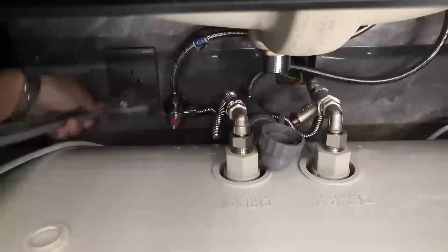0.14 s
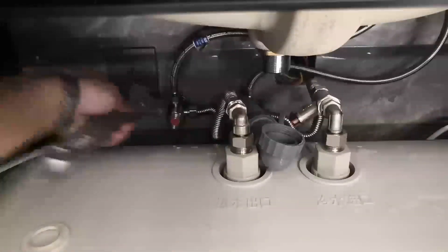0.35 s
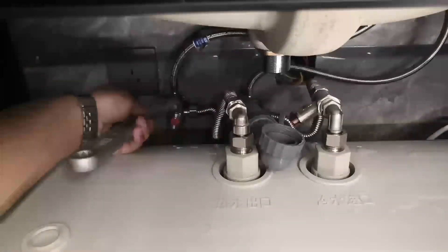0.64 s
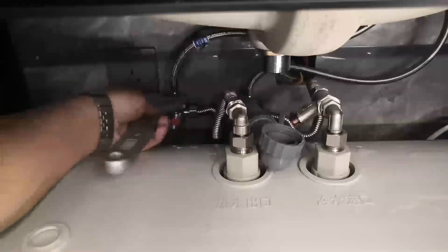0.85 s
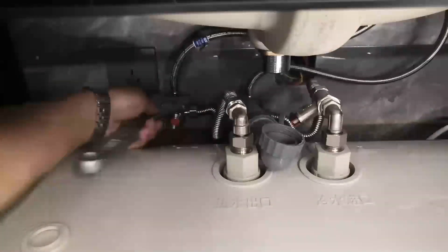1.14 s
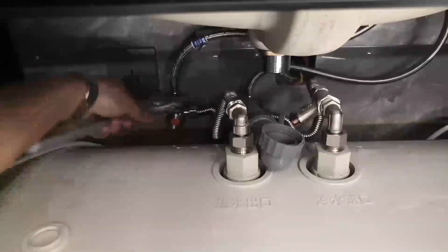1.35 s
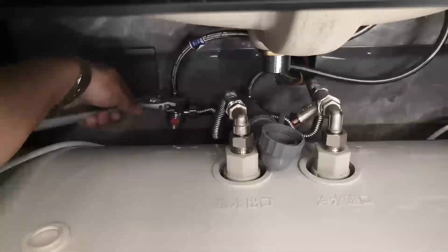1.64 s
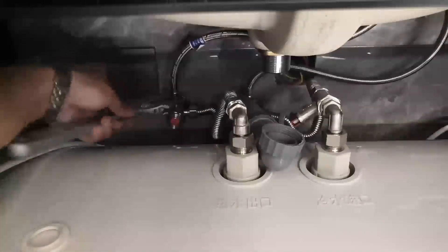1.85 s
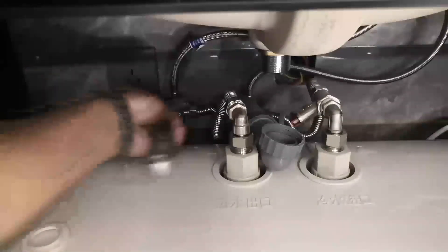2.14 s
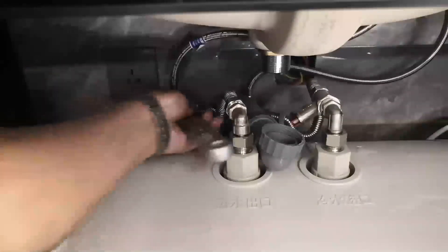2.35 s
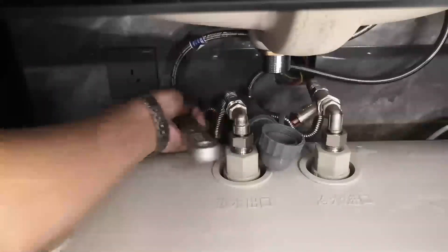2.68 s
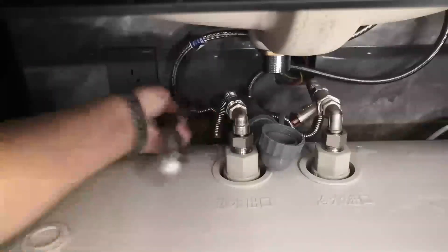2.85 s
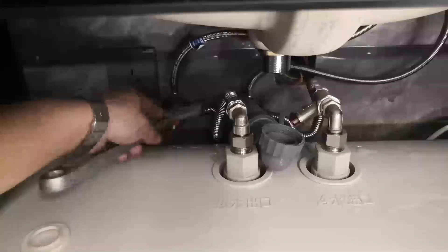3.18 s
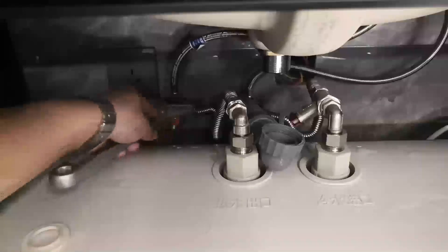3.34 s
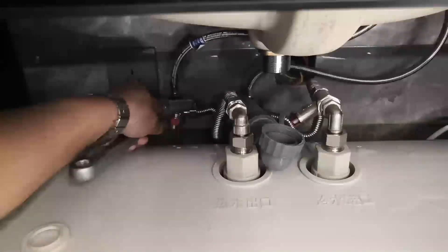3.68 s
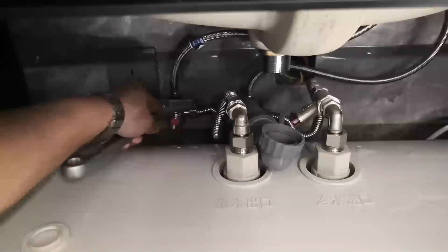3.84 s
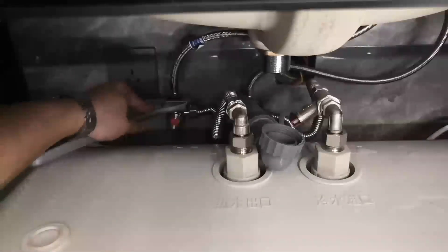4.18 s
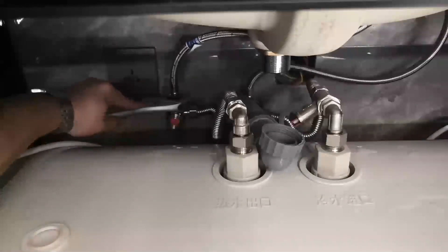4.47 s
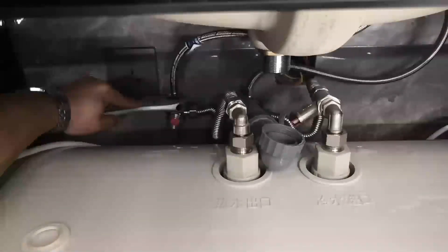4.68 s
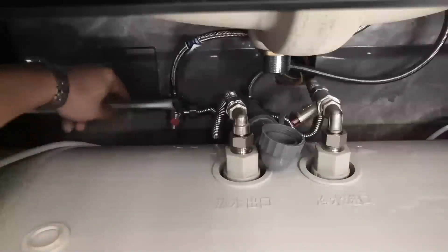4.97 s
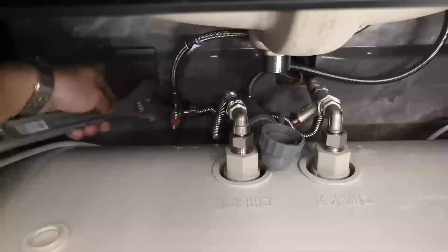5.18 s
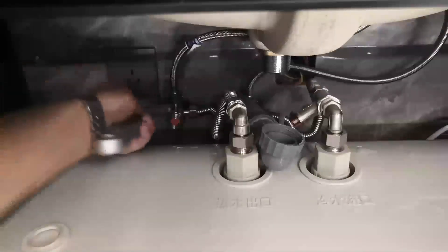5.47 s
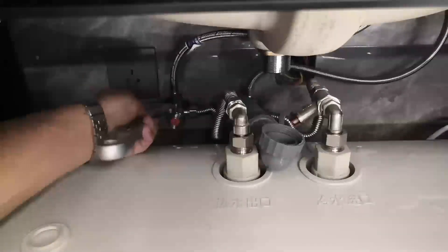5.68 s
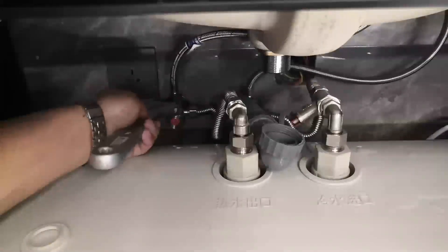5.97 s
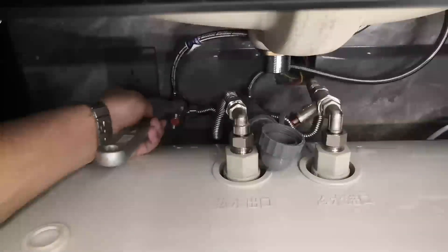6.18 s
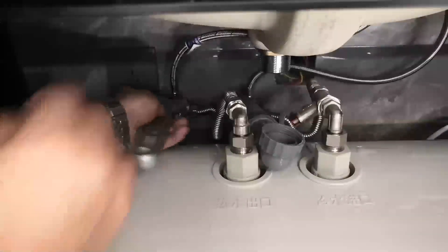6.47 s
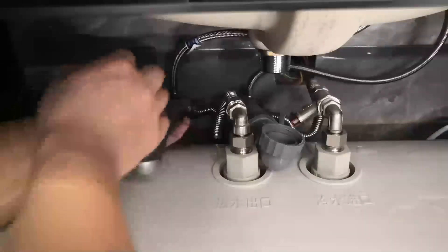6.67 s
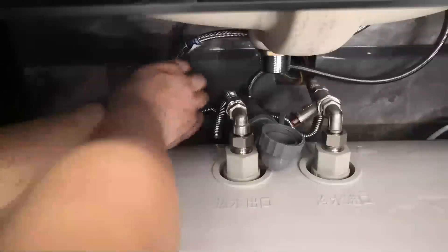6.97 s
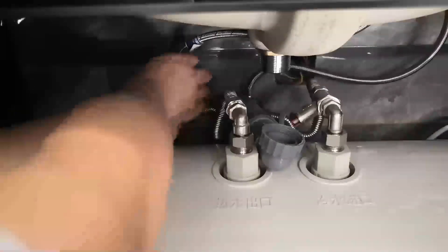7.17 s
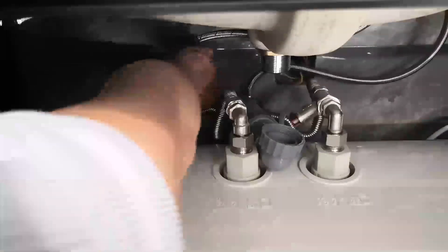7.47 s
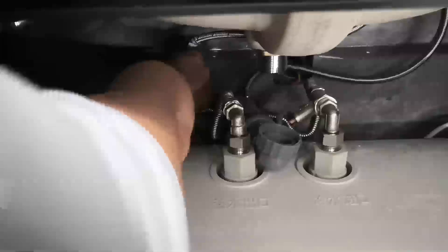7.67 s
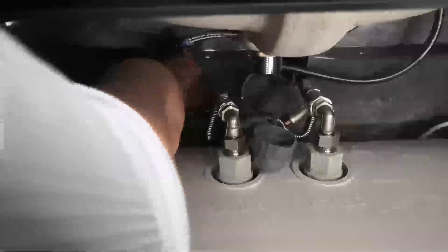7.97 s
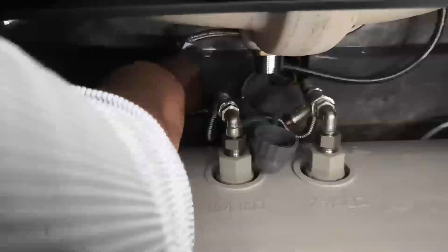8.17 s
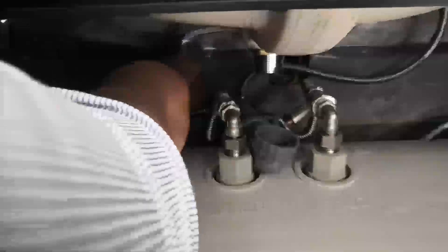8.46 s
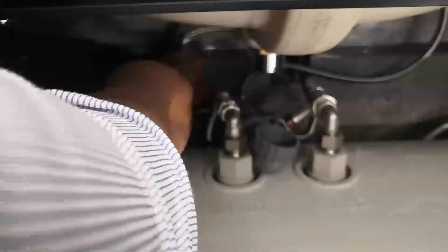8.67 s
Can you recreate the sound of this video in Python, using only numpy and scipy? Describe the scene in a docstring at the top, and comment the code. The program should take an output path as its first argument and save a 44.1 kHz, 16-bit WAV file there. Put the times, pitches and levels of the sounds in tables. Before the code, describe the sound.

A steady low rumble and soft hiss fill a cramped space under a sink, picked up by a close stereo microphone. Light wrench clicks on a nut come at about 0.7, 1.1 and 1.5 s, with small taps to 1.9 s. From 2.6 to 3.1 s clacks and scraping cluster; around 3.35 s a hollow pipe-and-tank knock sounds. Bright hard clanks at 3.7-4.0 s leave the loose jaw jangling. At 4.3 s friction starts a thin, wavering tank tone, near 1100 Hz, fading after 4.8 s among knocks. A quieter gap lasts until 5.7 s. Sharp ringing knocks crowd 5.95-6.65 s, and another burst falls at 7.0-7.1 s, with jangle and rubbing. Faint taps follow at 7.6-8.6 s as the wrench comes away. Dry cloth snaps and crackle hit the left side at 8.67-8.8 s. Echoes are short.

```python
"""Under a sink, over a steady rumble and hiss, a steel wrench is set on a hose nut with light clicks.
It is then turned: each contact is a short chatter of noise that rings wrench, fittings, pipes, tank and cabinet.
The loose jaw jangles on after some of the contacts, friction hisses and scrapes, and at 4.32 s the tank sings.
More hard knocks follow from about 5.7 to 7.1 s; then the wrench is lifted off with faint taps.
Last, cloth snaps on the left of two close microphone ports. Levels are as they reach the microphone."""
import sys
import numpy as np
from scipy import signal
from scipy.fft import rfft, irfft, next_fast_len
from scipy.io import wavfile
from scipy.ndimage import uniform_filter1d, map_coordinates

SR = 44100
rng = np.random.default_rng(int(sys.argv[2]) if len(sys.argv) > 2 else 0)


def wrap_up_sound(samples):
    """Save the sound to the file named by the first command line argument, as 16-bit audio."""
    columns = np.atleast_2d(samples).T
    # keep every value between -1 and 1, then stretch to whole-number steps
    tamed = np.clip(columns, -1, 1)
    steps = np.round(tamed * 32767).astype(np.int16)
    wavfile.write(sys.argv[1], SR, steps)


N = 389391


def amp(db):
    """Turn decibels into a plain gain."""
    return 10 ** (np.asarray(db) / 20)


def unit(x):
    """Scale each row to an rms of 1."""
    return x / np.sqrt(np.mean(x ** 2, -1, keepdims=True) + 1e-20)


def along(points, hz):
    """Read a curve of (f/Hz, value) points, joined by straight lines on a log frequency axis."""
    f, v = np.transpose(points)
    return np.interp(np.log(hz + 1), np.log(f + 1), v)


def wobble(rate):
    """A smooth random curve with `rate` random points a second."""
    knots = rng.standard_normal(int(N * rate / SR) + 4)
    return map_coordinates(knots, [np.arange(N) * rate / SR])


def filtered(x, response):
    """Shape x by a response that depends on frequency."""
    m = next_fast_len(N + SR // 2)
    return irfft(rfft(x, m) * response(np.fft.rfftfreq(m, 1 / SR)), m)[..., :N]


def resonance(f, hz, width_hz):
    """One part that likes to vibrate at hz; the narrower the peak, the longer it rings."""
    return 1j * f * width_hz / (hz * hz - f * f + 1j * f * width_hz)


def body(peaks, f):
    """An object as a sum of resonances; neighbours in the list push in opposite directions."""
    return sum((-1) ** k * amp(db) * resonance(f, hz, width) for k, (hz, width, db) in enumerate(peaks))


# how far the left microphone port leads the right: [f/Hz, phase/rad]
PORT_LEAD = [(0, 0), (340, 0.0), (780, 3.2), (1380, -0.1), (1640, 0.5), (2240, -3.0), (2580, -3.3),
             (3530, -7.4), (5430, -6.3), (10700, -6.3)]


def ports(f):
    """The phase step between the two microphone ports, half on each side."""
    return np.exp(.5j * np.array([[1], [-1]]) * along(PORT_LEAD, f))


def pair(z, alike, f):
    """Mix two unrelated spectra into left and right, as alike as asked at each frequency."""
    turn = np.arccos(np.clip(along(alike, f), -1, 1)) / 2
    mid = z[..., 0, :] * np.cos(turn)
    side = z[..., 1, :] * np.sin(turn)
    return np.stack([mid + side, mid - side], -2)


def noise(patchy_db, alike, colour):
    """Coloured stereo noise of rms 1, with random louder and softer patches in time and frequency."""
    z = signal.stft(rng.standard_normal((2, N)), nperseg=256)[2]
    across_pitch = uniform_filter1d(rng.standard_normal(z.shape[1:]), size=4, axis=0)
    field = uniform_filter1d(across_pitch, size=6, axis=1)
    x = signal.istft(z * amp(patchy_db * field / field.std()), nperseg=256)[1][:, :N]
    m = next_fast_len(N + SR // 2)
    f = np.fft.rfftfreq(m, 1 / SR)
    return unit(irfft(pair(rfft(x, m), alike, f) * colour(f), m)[:, :N])


# colour of the room's rumble, then of its hiss: [f/Hz, relative level/dB]
RUMBLE_COLOUR = [(15, -37), (25, -7.5), (43, -3.5), (128, -2.5), (163, -19.5), (189, -14), (210, -4.5),
                 (274, -12), (293, -12), (357, -11), (392, -34.5), (436, -18.5), (479, -24), (518, -30.5),
                 (600, -43.5), (780, -71), (1320, -120)]
HISS_COLOUR = [(290, -31.5), (500, -0.5), (588, -4), (924, -3.5), (1220, -6), (1330, 1.5), (1420, 0.5),
               (10000, -25.5), (13000, -39.5), (22000, -120)]
# how alike left and right are: [f/Hz, likeness from -1 to 1]
HUM_LIKENESS = [(60, 0.98), (170, 1), (280, 0.51), (470, 0.042), (1330, -0.38), (3750, -0.028), (10500, 1)]


def hum(rumble_db=-52.5, hiss_db=-61.5):
    """The room's steady rumble and hiss, two layers of coloured noise."""
    rumble = noise(2.54, HUM_LIKENESS, lambda f: amp(along(RUMBLE_COLOUR, f)))
    hiss = noise(2.2, HUM_LIKENESS, lambda f: amp(along(HISS_COLOUR, f)))
    return amp(rumble_db) * rumble + amp(hiss_db) * hiss


# cloth catching on the left microphone port: [t/s, peak level/dB]
CLOTH_SNAGS = [(8.6741, -28), (8.679, -26), (8.6895, -34), (8.7566, -32), (8.7684, -22), (8.7812, -23),
               (8.7872, -30), (8.8095, -22), (8.813, -20)]


def sleeve(crackle_db=-14, drop_10db_s=.0089, right_db=-22):
    """Cloth makes short dry snaps, each leaving a little crackle, barely heard by the right port."""
    snaps, t, now = np.zeros(N + SR), np.arange(60) / SR, np.arange(N) / SR
    level = 0
    for s, db in CLOTH_SNAGS:
        snap = np.cos(2 * np.pi * rng.uniform(2000, 4000) * t) * amp(-60 * t / .0014)
        snaps[round(s * SR):][:len(t)] += amp(db) * snap
        level = level + (now > s) * amp(db + crackle_db - 10 * np.abs(now - s) / drop_10db_s)
    grit = amp(4 * wobble(500)) * rng.standard_normal(N)
    crackle = level * unit(filtered(grit, lambda f: resonance(f, 2000, 3000) ** 2))
    return (snaps[:N] + crackle) * amp([[0], [right_db]])


def singing(hz=1122, width_hz=20, start_s=4.32, hold_until_s=4.76, level_db=-49.5, drop_20db_s=.16):
    """As the nut drags round, friction makes the tank sing one thin note that wavers, holds and fades."""
    now = np.arange(N) / SR
    fade_db = 20 * np.maximum(now - hold_until_s, 0) / drop_20db_s
    level = (now > start_s) * amp(level_db - fade_db)
    return level * noise(0.63, [(1000, 0.94)], lambda f: resonance(f, hz, width_hz) ** 2 * ports(f))


# strokes of jaws, hand and sleeve: [peak t/s, swell/s, fade/s, low drag level/dB, scrape level/dB,
# rustle level/dB, left over right/dB (scrape and rustle only)]
RUB_STROKES = [(.72, 0.06, 0.21, -85, -43.5, -45, 0), (1.56, 0.076, 1, -57.5, -58.5, -70, 0),
               (1.72, 0.32, 0.24, -73, -51.5, -80, -1), (1.85, 0.044, 0.065, -61, -55, -86, 1),
               (2.659, 0.067, 0.14, -49, -36.5, -40.5, -2), (3.051, 0.13, 0.17, -55, -35, -41.5, -1.5),
               (3.41, 0.031, 0.31, -40.5, -32, -75.5, -1), (3.85, 0.1, 0.089, -67.5, -49.5, -38.5, -1.5),
               (4.12, 0.11, 0.32, -60, -60, -48, -7), (4.5, 0.19, 0.19, -45.5, -43.5, -79, 0.5),
               (4.8, 0.14, 0.38, -55, -53, -59, 0.5), (5.76, 0.061, 0.18, -39.5, -38.5, -58, -2),
               (6.1, 0.2, 0.64, -55.5, -65.5, -50.5, 0), (6.49, 0.074, 0.21, -45, -44.5, -40.5, 0),
               (6.68, 0.067, 0.14, -34, -39.5, -42.5, 0), (7.201, 0.23, 0.29, -49.5, -39, -44, -2),
               (7.602, 0.048, 0.37, -54, -45, -54.5, 0), (8.8, 0.058, 0.17, -50, -44.5, -61, 16),
               (8.5, 0.087, 0.17, -57, -59, -50.5, 13.5)]
# colour of the rustle: [f/Hz, relative level/dB]
RUSTLE_COLOUR = [(1470, -7), (2500, 1), (4190, 1), (9370, -5.5), (9770, -34), (10500, -59), (13600, -102.5),
                 (22000, -120)]
# resonances of pipework, sheet-metal tank, cabinet panel, air in the cabinet, and the broad
# bands of the short brass fittings; contacts() uses them too: [f/Hz, width/Hz, relative level/dB]
PIPE_PEAKS = [(1565, 120, 7.5), (1926, 200, 11), (2440, 244, 15.5), (2446, 207, 10.5), (2696, 85, 1.5),
              (2830, 82, 5.5), (3260, 1300, -5.5), (3780, 750, -1.5)]
TANK_PEAKS = [(539.5, 69, -2.5), (691, 120, -1.5), (762.5, 6.7, 11), (833, 41, 6), (959, 42, 12),
              (961.5, 198, 8), (1047.3, 27, 10), (1098, 8.9, 5.5), (1258, 330, -5.5), (1395, 12, 0.5),
              (1642, 5.3, 2), (2040, 52, -12)]
PANEL_PEAKS = [(204, 23.5, 5.5), (318.7, 44, -1.5), (434, 130, -8)]
AIR_PEAKS = [(95, 27, 0.0097), (138, 33, 0.0036)]
FITTING_PEAKS = [(2830, 130, 2), (3950, 160, -6), (4400, 130, 1), (4640, 110, 2), (5350, 140, -6),
                 (5750, 220, 2), (6700, 170, -2), (7350, 200, -1), (7950, 170, -3), (9050, 220, -7)]
# how alike left and right are in drag and echoes: [f/Hz, likeness from -1 to 1]
ROOM_LIKENESS = [(100, 1), (300, 0.67), (1000, 0.067), (10000, 0.8)]


def rubbing(stroke_drop_db=20.5, rest_db=(-62.5, -72, -83), step=64):
    """Gritty friction, its grip changing fast, sounds through panel, tank and pipes; cloth and steel hiss."""
    s, swell_s, fade_s, *level_db, pan_db = np.transpose(RUB_STROKES)[:, :, None]
    late = np.arange(0, N, step) / SR - s
    # a stroke loses stroke_drop_db over one swell or fade time
    shape = amp(-stroke_drop_db * np.where(late < 0, (late / swell_s) ** 2, late / fade_s))
    sides = amp(pan_db * [.5, -.5])

    def level(db, faint_db):
        """Add up the strokes over a faint resting level, left and right, sample by sample."""
        coarse = (amp(db) * sides).T @ shape + amp(faint_db)
        return np.array([np.interp(np.arange(N), np.arange(len(c)) * step, c) for c in coarse])

    drag, scrape, rustle = [level(db, faint_db) for db, faint_db in zip(level_db, rest_db)]
    grip = amp(2 * wobble(300) + 2 * wobble(50) + 2 * wobble(14))
    cabinet = lambda f: body(PANEL_PEAKS, f) + amp(2.5) * body(AIR_PEAKS, f)
    sheet = lambda f: (body(TANK_PEAKS, f) + amp(-5.5) * body(PIPE_PEAKS, f)) * ports(f)
    hiss = lambda f: amp(along(RUSTLE_COLOUR, f)) * (.7 + body(FITTING_PEAKS, f)) * ports(f)
    # the low drag keeps one level for both sides
    drag = drag.mean(0) * noise(4.0, ROOM_LIKENESS, cabinet)
    scrape = scrape * noise(1.8, [(1000, 0.2)], sheet)
    rustle = rustle * noise(3.5, [(5000, .6)], hiss)
    return drag + grip * (scrape + rustle)


# modes of the wrench, used by contacts() too: [f/Hz, width/Hz before any blur, relative level/dB]
WRENCH_MODES = [(1530, 14, -7.5), (1960, 10, -11), (2315, 20, -8), (2800, 27, 1.5), (2860, 9, -7),
                (3550, 12, -14), (4120, 14, -7), (4226, 14, -22.5), (4377, 3.3, -2.5), (4625, 3.3, 1),
                (4670, 16, -1), (5500, 11, -13), (5340, 8.3, -12.5), (5900, 12, -1), (5700, 10, -8.5),
                (5810, 26, -2.5), (5925, 19, -5), (5620, 18, -5), (6560, 20, -10.5), (6770, 12, -2),
                (7289, 16, 3), (7670, 39, -5.5), (7450, 18, -11), (9200, 9.5, -18), (9500, 16, -10.5)]
# groups of wrench modes, low, middle, high and top: [from f/Hz, to f/Hz]
JANGLE_GROUPS = [(1400, 3500), (3500, 5000), (5000, 6200), (6200, 9500)]
# jangling after some of the contacts: [t/s, time to lose 60 dB/s, low level/dB, middle level/dB,
# high level/dB, top level/dB]
JANGLE_TIMES = [(0.77, 0.78, -61, -57, -53, -60), (1.14, 0.89, -72, -75, -66, -69),
                (2.72, 0.58, -52, -57, -53.5, -50), (3.049, 0.53, -46, -50, -47, -49),
                (3.82, 0.72, -46, -44, -50, -49), (4.01, 0.66, -39.5, -35, -37.5, -42),
                (4.67, 0.66, -55, -53, -55, -47), (6.045, .8, -43, -39, -43.5, -49),
                (6.35, 0.74, -50, -53, -53, -49), (7.11, 0.97, -39, -53, -44, -45)]


def jangle(blur=3, onset_s=.0087):
    """The wrench hangs loose on the nut; its jaw widens the modes and keeps them sounding, wavering."""
    now, out = np.arange(N) / SR, 0
    for k, (low, high) in enumerate(JANGLE_GROUPS):
        level = 0
        for s, t60, *db in JANGLE_TIMES:
            onset = np.clip((now - s) / onset_s, 0, 1)
            level = level + onset * amp(db[k] - 60 * np.abs(now - s) / t60)
        group = [mode for mode in WRENCH_MODES if low < mode[0] < high]
        modes = lambda f: sum(amp(db) * resonance(f, hz, blur * width) ** 2 for hz, width, db in group)
        out = out + level * noise(4.8, [(5000, 1.0)], lambda f: ports(f) * modes(f))
    return out


# how fast echoes die: [f/Hz, time to lose 60 dB/s]
ECHO_TIMES = [(150, 0.78), (700, 0.34), (2000, 0.14), (5000, 0.14), (10000, 0.14)]


def tails(count):
    """Stereo room echoes of energy 1, made of noise; each frequency dies at its own speed."""
    f, t, z = signal.stft(rng.standard_normal((count, 2, SR // 2)), SR, nperseg=256)
    tail = signal.istft(z * amp(-60 * t / along(ECHO_TIMES, f)[:, None]), SR, nperseg=256)[1]
    return unit(tail) / np.sqrt(tail.shape[-1])


SPAN, LEAD_IN = 32768, 1000  # samples per contact, and how many of them come before it


def close(to_hz, own_hz):
    """How near two pitches lie: 1 when equal, falling off over about three percent."""
    return np.exp(-(np.log(own_hz / to_hz) / .03) ** 2)


def chatter(s, fall_ms, grain_db=4, rattle_t60=1.0, blow=8.35, blow_ms=9.8):
    """Spectra of the noisy force of each contact, and of the shaking that rattles the wrench on after it."""
    rise_ms = 0.18 * fall_ms
    ms = 1000 * np.arange(-LEAD_IN, SR // 3) / SR
    late = ms - rise_ms
    # short rises start abruptly, long ones swell
    rising = np.clip(ms / np.maximum(rise_ms, .3), 0, 1) ** (rise_ms / 7)
    swell = np.where(late < 0, rising, np.exp(-(late / np.maximum(fall_ms, 1)) ** 2))
    rattle = np.where(late < 0, rising, amp(-60 * np.abs(late) / 1000 / rattle_t60))
    # the next contact stops the rattle
    rattle = rattle * (ms < 1000 * np.diff(s, axis=0, append=np.inf))
    # tiny uneven taps about a millisecond long
    grain = uniform_filter1d(rng.standard_normal(swell.shape), size=30, axis=1)
    taps = amp(grain_db * unit(grain))
    # one first tap stands out, less so in chatters longer than blow_ms
    first_tap = blow * np.exp(-(fall_ms / blow_ms) ** 2) * (np.arange(len(ms)) == LEAD_IN + 20)
    envelopes = np.array([swell * taps, swell + 0.35 * rattle])
    return rfft(envelopes * rng.standard_normal(swell.shape) + first_tap, SPAN)


def wrench_ring(shaking, f, hz, first_hz, second_hz, ring_db, fall_ms, scatter_db=2):
    """The steel wrench rings in the modes its striking point favours, damped by the hand."""
    mode_hz, width, mode_db = np.transpose(WRENCH_MODES)
    near = 0.15 + close(first_hz, mode_hz) + 0.78 * close(second_hz, mode_hz) + 0.12 * close(hz, mode_hz)
    signs = (-1) ** np.arange(len(WRENCH_MODES))
    share = near * amp(mode_db + scatter_db * rng.standard_normal(near.shape)) * signs
    # every mode gets its share of the shaking, whatever the chance dips of its spectrum
    power = uniform_filter1d(np.abs(shaking) ** 2, size=7, axis=1)
    share = share / np.sqrt(power[:, np.round(mode_hz * SPAN / SR).astype(int)] + 1e-12)
    ring = irfft(shaking * (share @ resonance(f, mode_hz[:, None], width[:, None])), SPAN)
    # the damping time halves for each 23.5 dB weaker ring; a long chatter lengthens it
    grip_t60 = 0.5 ** ((ring_db.max() - ring_db) / 23.5) + fall_ms / 250
    return rfft(ring * amp(-60 * np.arange(SPAN) / SR / grip_t60))


# colour of the bare click: [f/Hz, relative level/dB]
CLICK_COLOUR = [(800, -45.5), (2000, -0.5), (3500, -2.5), (6000, -1), (8000, -2), (11000, -13)]


def brass_click(f, hz, first_hz, second_hz, click_db, ring_db, floor=.24, dead_slope=.5, shift=.02):
    """The click's colour: short brass fittings sound in broad bands, a little moved at each contact."""
    band_hz, band_width, band_db = np.transpose(FITTING_PEAKS)
    size = (len(hz), len(FITTING_PEAKS))
    gains = amp(band_db + 2 * rng.standard_normal(size)) * (-1) ** np.arange(len(FITTING_PEAKS))
    gains = gains * (1.1 + close(first_hz, band_hz) + close(second_hz, band_hz) + close(hz, band_hz))
    centres = band_hz * (1 + shift * rng.standard_normal(size))
    # more sound is left between the bands when the wrench rings less
    brass = floor * amp(dead_slope * np.clip(click_db - ring_db, 0, 30))
    for gain, centre, wide in zip(gains.T, centres.T, band_width):
        brass = brass + gain[:, None] * resonance(f, centre[:, None], wide)
    return amp(along(CLICK_COLOUR, f)) * (0.98 + resonance(f, hz, 1500)) * brass


# contacts, peak levels before echo and panning: [t/s, click level/dB, click centre f/Hz,
# wrench ring level/dB, first favoured wrench f/Hz, second favoured wrench f/Hz, pipe level/dB,
# pipe centre f/Hz, tank level/dB, cabinet panel level/dB, chatter length/ms, left over right/dB]
WRENCH_CONTACTS = [(0.655, -52, 2625, -59, 2900, 1530, -39, 2800, -38, -34.5, 49, 3),
                   (0.699, -30, 2870, -41, 2840, 1530, -27.5, 2980, -32.5, -39.5, 41, 1.5),
                   (0.735, -15.5, 4540, -47, 4625, 5800, -34, 2800, -42, -53, 17.5, -3.5),
                   (0.789, -36.5, 4630, -35, 2870, 4625, -42, 2760, -70, -47, 5.6, 2),
                   (0.999, -57, 5740, -79, 1530, 2790, -45.5, 1640, -75, -33, 37, 6.5),
                   (1.137, -27.5, 6000, -45, 5750, 6900, -41, 2330, -52, -75, 5.5, 3),
                   (1.489, -20.5, 3700, -27, 2380, 4800, -20, 2200, -24, -29, 6.9, -1),
                   (1.551, -38.5, 2590, -37, 2340, 1530, -57, 2360, -37.5, -38, 57, -1),
                   (1.661, -48, 2650, -49, 2340, 1530, -43, 2300, -38, -61, 14.4, 6),
                   (1.77, -48, 2750, -55, 2340, 1530, -40, 2350, -35.5, -63, 5.7, 1),
                   (1.868, -60, 2790, -66, 2340, 2870, -36.5, 2360, -34, -46, 10.3, 4),
                   (1.928, -48.5, 2800, -55, 4625, 1530, -52, 1550, -57, -52, 11, 1),
                   (2.597, -33.5, 2680, -64, 2340, 4625, -41, 2350, -35.5, -45, 28, 5),
                   (2.64, -27, 7000, -51, 2330, 5680, -36, 2280, -34, -51, 61, 2),
                   (2.657, -16.5, 8200, -32, 2830, 5370, -36, 2780, -57, -36, 14, -0.7),
                   (2.713, -18, 5040, -34, 5500, 2950, -29.5, 2350, -38, -38, 17, -0.5),
                   (2.908, -22, 4400, -18, 2360, 2870, -15, 2500, -22, -40, 1.96, -0.5),
                   (2.921, -19, 2720, -50, 4625, 2830, -52, 2080, -57, -40.5, 4.6, 4),
                   (2.984, -21.5, 3000, -24.5, 2900, 2340, -19.5, 2320, -28, -57, 2.6, 4.5),
                   (3.022, -20.5, 4830, -22, 4625, 2340, -28.5, 2830, -27.5, -37, 15, 7.5),
                   (3.04, -15.5, 4940, -42, 4625, 7400, -45, 2290, -34, -26, 7.1, -0.5),
                   (3.331, -18, 2670, -27.5, 1530, 2790, -4.5, 1680, -11, -20, 8.3, 2),
                   (3.348, -27.5, 2680, -58, 1530, 2790, -22, 2130, -17, -34.5, 6.5, -1.5),
                   (3.374, -35.5, 2750, -31, 2800, 1530, -13.5, 1660, -24.5, -30.5, 14, -1.2),
                   (3.678, -41.5, 4630, -61, 1530, 2870, -51.5, 1550, -58.5, -57.5, 7, 4),
                   (3.713, -12, 5550, -27, 5800, 4700, -22, 2820, -39, -50, 14, 0),
                   (3.793, -17, 7200, -18, 2270, 6800, -30.5, 2300, -45.5, -48.5, 10, -1),
                   (3.822, -19, 4600, -24, 2770, 7289, -38, 2830, -56.5, -43.5, 7, 5),
                   (3.931, -19, 7100, -27, 2820, 4400, -42.5, 2800, -64, -51, 12, 4.5),
                   (3.97, -5.5, 4270, -23.5, 4377, 2360, -13, 2430, -40, -59, 11, 2.5),
                   (3.996, -1.5, 4590, -15, 4490, 2840, -42, 2780, -46, -42, 6.5, 1.7),
                   (4.32, -27, 3000, -34.5, 2320, 4625, -15.5, 2340, -19.5, -24.5, 1.9, -2),
                   (4.397, -32.5, 4300, -35, 4625, 2310, -28.5, 1740, -30, -41, 6.8, 0.5),
                   (4.479, -45.5, 2830, -37, 4625, 2830, -21, 1693, -20.5, -45, 6.1, 7),
                   (4.635, -76, 3900, -79, 1530, 2340, -65, 1300, -31.5, -42, 19, -5),
                   (4.658, -11.5, 3900, -63, 2320, 2950, -20, 2190, -34.5, -40, 9, 4),
                   (4.708, -34.5, 7560, -40, 7440, 2340, -31, 1710, -28, -40.5, 25, -1),
                   (4.838, -14, 2400, -60, 2340, 1530, -19.5, 2230, -26.5, -32.5, 2.77, -0.5),
                   (5.133, -58.5, 2690, -77, 1530, 2340, -41.5, 1740, -45, -56, 2, 5),
                   (5.724, -38, 2560, -48, 2290, 2870, -27, 2120, -39.5, -58.5, 81, 6),
                   (5.746, -19.5, 2800, -38, 2340, 2810, -20.5, 2310, -28.5, -60, 2, -3.5),
                   (5.962, -11.5, 3100, -34, 2870, 4250, -21, 2880, -40, -43, 16, 8.5),
                   (5.991, -15.5, 6700, -31.5, 2630, 5750, -26.5, 2860, -34.5, -46.5, 14, -2),
                   (6.021, -18, 5760, -30.5, 5925, 2790, -41.5, 2830, -56, -47, 16, 13.5),
                   (6.031, -9.5, 5500, -26.5, 5700, 2850, -25.5, 2880, -45, -49.5, 14, 0),
                   (6.088, -26, 4400, -29, 5520, 4377, -32, 2870, -55, -52.5, 6.3, -3),
                   (6.259, -7, 5470, -10, 7289, 7289, -21.5, 2220, -23, -47, 13, 5),
                   (6.311, -27, 6900, -20, 7289, 2340, -24, 2400, -35.5, -41, 6.9, 2),
                   (6.341, -13, 4230, -30.5, 2930, 5400, -25, 2890, -28.5, -72.5, 9.7, 0),
                   (6.42, -7.5, 4550, -27.5, 5810, 7289, -20, 2230, -28.5, -27, 7.7, 0.5),
                   (6.549, -26, 6700, -43, 2320, 4650, -28, 2170, -33.5, -44, 15, 2),
                   (6.652, -20.5, 5560, -38, 4625, 1530, -32.5, 1620, -19, -30.5, 7, 6.5),
                   (6.867, -40, 3200, -37, 2810, 5500, -38, 3070, -53, -65, 13, 3),
                   (6.986, -29, 2740, -60, 2370, 2960, -22, 2450, -22, -27.5, 12, 2.5),
                   (7.017, -22, 6500, -29, 7289, 5700, -21, 2420, -45.5, -32.5, 3.9, -4),
                   (7.051, -8.5, 6050, -36, 5700, 5900, -15, 2400, -23, -43, 15, 4.5),
                   (7.078, -15, 4640, -30, 4625, 2870, -13.5, 2550, -22, -27, 22, 4.5),
                   (7.092, -13.5, 5800, -28, 6770, 4625, -18, 2520, -38, -38.5, 7.1, 0.5),
                   (7.559, -54, 5900, -46, 1530, 2920, -43, 1310, -32, -72, 7.8, -6),
                   (7.695, -38, 2790, -43.5, 1530, 2870, -29.5, 1850, -33.5, -60, 1.1, 6.5),
                   (7.949, -70, 2930, -53, 2870, 2360, -44, 2940, -55.5, -51, 5.8, 17),
                   (8.334, -63, 2990, -51.5, 1530, 2920, -37.5, 2200, -57, -63, 2.5, 1),
                   (8.46, -48, 3000, -64.5, 2870, 2360, -35.5, 1900, -54.5, -64, 21, 2),
                   (8.621, -54, 6710, -48.5, 6800, 5740, -42.5, 1820, -61, -51.5, 55, 4)]


def contacts(room_db=-3.5, spread_s=3e-5, pan_hz=600):
    """A burst of chatter per contact drives fittings, wrench, pipes, tank, panel and cabinet air."""
    columns = np.transpose(WRENCH_CONTACTS)[:, :, None]
    s, click_db, hz, ring_db, first_hz, second_hz = columns[:6]
    pipe_db, pipe_hz, tank_db, panel_db, fall_ms, pan_db = columns[6:]
    f = np.fft.rfftfreq(SPAN, 1 / SR)
    force, shaking = chatter(s, fall_ms)
    ring = wrench_ring(shaking, f, hz, first_hz, second_hz, ring_db, fall_ms)
    click = force * brass_click(f, hz, first_hz, second_hz, click_db, ring_db)
    pipe = force * body(PIPE_PEAKS, f) * (0.4 + resonance(f, pipe_hz, 730))

    def scaled(db, z):
        """Set the peak level of each contact."""
        return amp(db) * z / np.abs(irfft(z, SPAN)[:, :SR // 6]).max(1, keepdims=True)

    dry = scaled(click_db, click) + scaled(pipe_db, pipe) + scaled(ring_db, ring)
    dry = dry + scaled(tank_db, force * body(TANK_PEAKS, f))
    dry = dry + scaled(panel_db, force * body(PANEL_PEAKS, f))
    # the air in the cabinet booms 7.5 dB under its panel
    dry = dry + scaled(panel_db - 7.5, force * body(AIR_PEAKS, f))
    room = pair(rfft(tails(count=len(s)), SPAN), ROOM_LIKENESS, f)
    # each contact sits at its own spot, so reaches one port a little early
    early = np.exp(1j * np.pi * f * spread_s * rng.standard_normal((len(s), 1, 1)) * [[1], [-1]])
    # the bass below pan_hz stays nearly central
    pan = amp(pan_db[:, None] * [[.5], [-.5]] * f / (f + pan_hz))
    heard = irfft(dry[:, None] * (ports(f) * early + amp(room_db) * room) * pan, SPAN)
    out = np.zeros((2, N + SPAN))
    for start, sound in zip(np.round(s[:, 0] * SR).astype(int) - LEAD_IN, heard):
        out[:, start:start + SPAN] += sound
    return out[:, :N]


def scene():
    """Add up all the layers, from the background to the wrench."""
    return hum() + sleeve() + singing() + rubbing() + jangle() + contacts()


# response of the microphone: [f/Hz, gain/dB]
MIC_RESPONSE = [(9750, -2.5), (10000, -18.5), (11000, -32.5)]


def record(dry, top_hz=11150):
    """The microphone fades near its band limit and keeps nothing above it but a trace of hiss."""
    heard = filtered(dry, lambda f: amp(along(MIC_RESPONSE, f)) * (f < top_hz))
    return heard + amp(-104) * rng.standard_normal(dry.shape)


dry = scene()
out = record(dry)
wrap_up_sound(out)
```